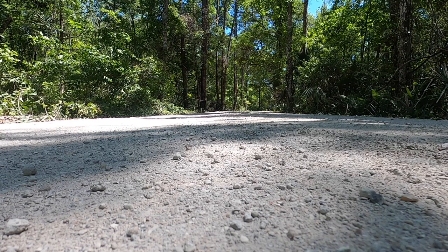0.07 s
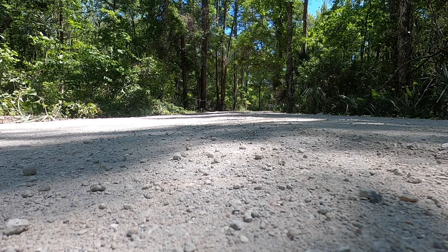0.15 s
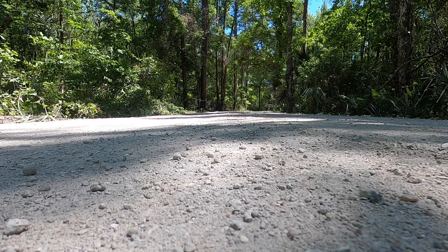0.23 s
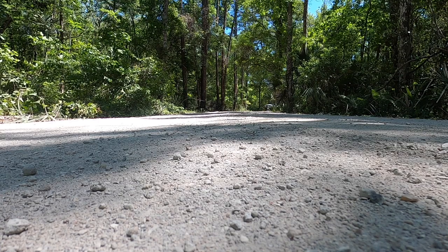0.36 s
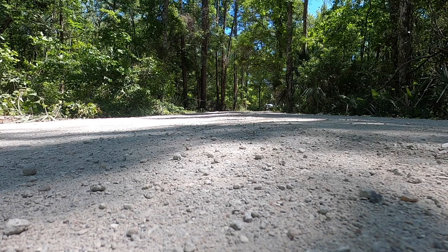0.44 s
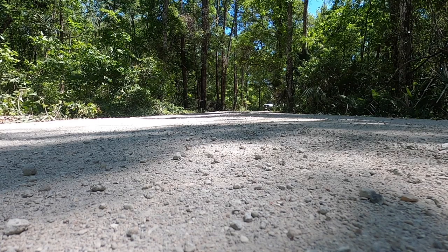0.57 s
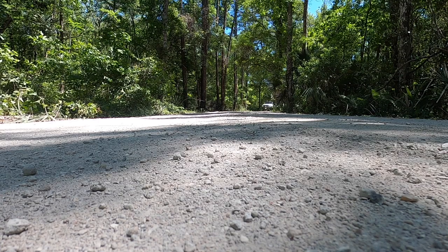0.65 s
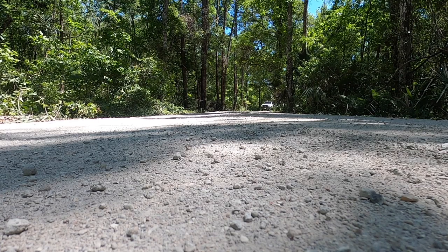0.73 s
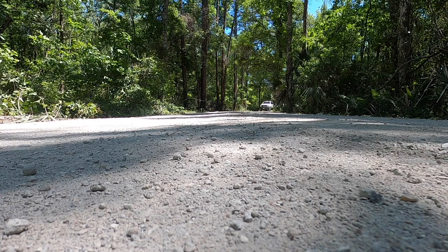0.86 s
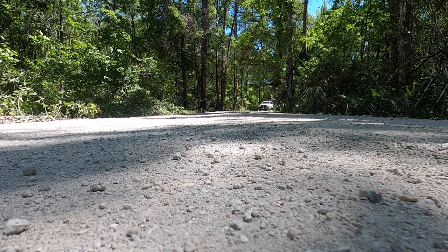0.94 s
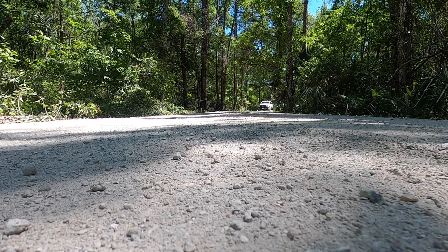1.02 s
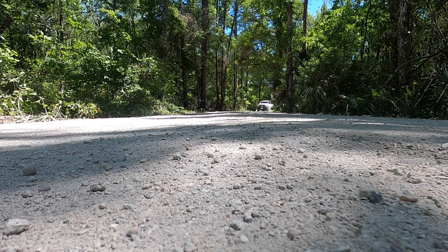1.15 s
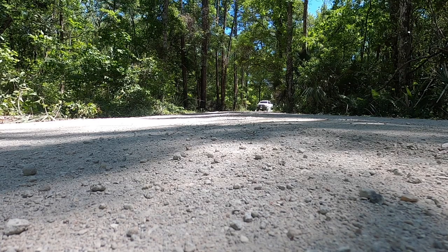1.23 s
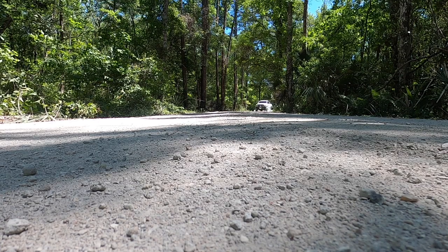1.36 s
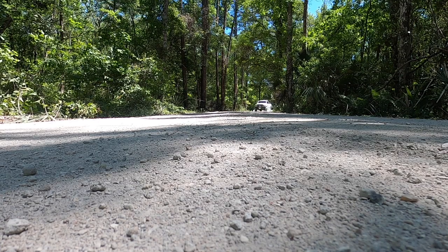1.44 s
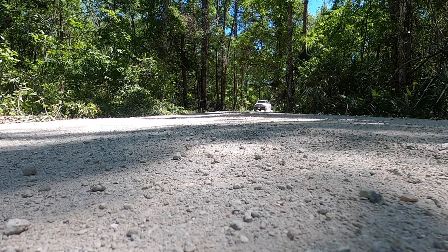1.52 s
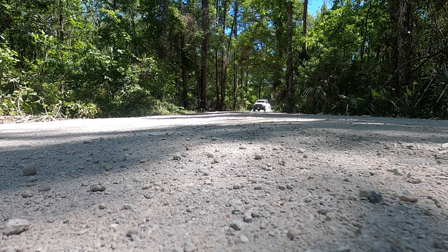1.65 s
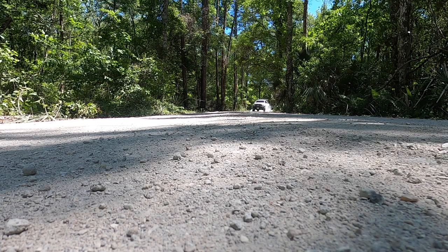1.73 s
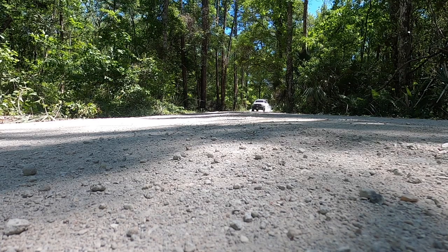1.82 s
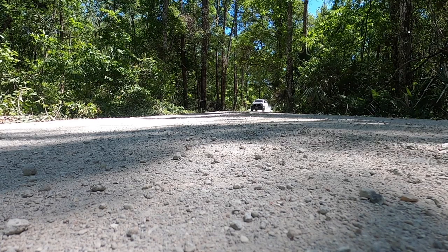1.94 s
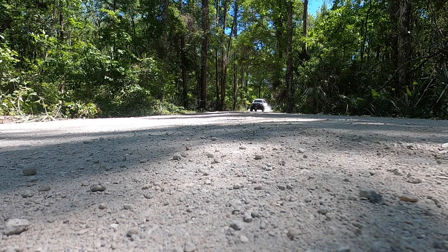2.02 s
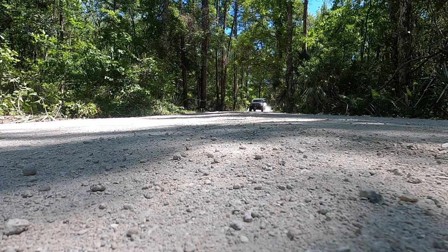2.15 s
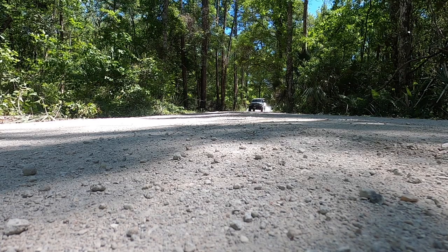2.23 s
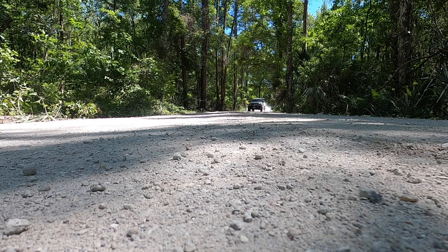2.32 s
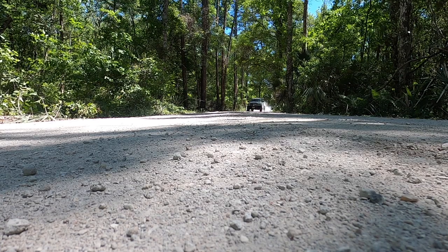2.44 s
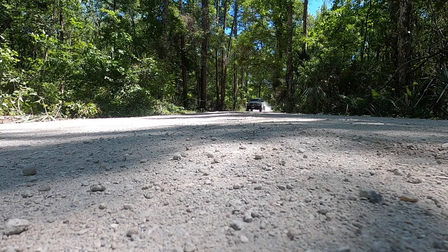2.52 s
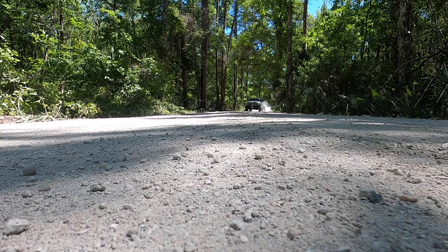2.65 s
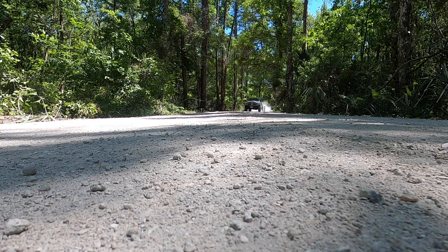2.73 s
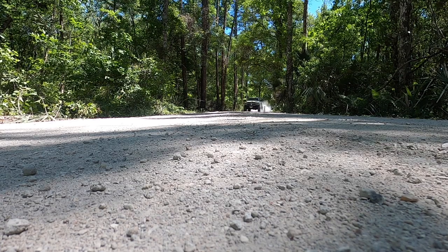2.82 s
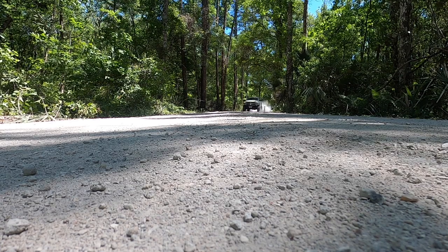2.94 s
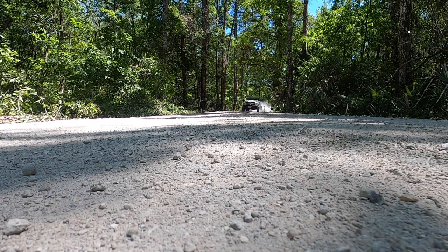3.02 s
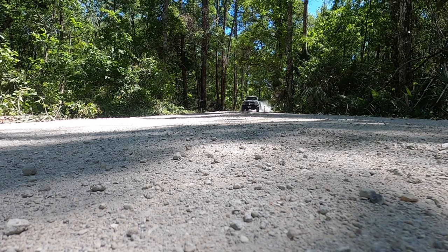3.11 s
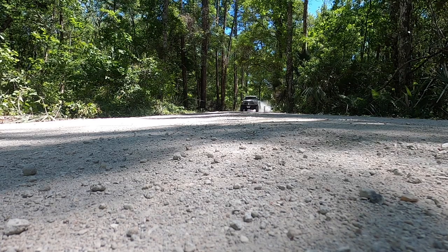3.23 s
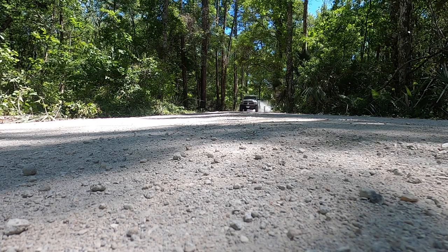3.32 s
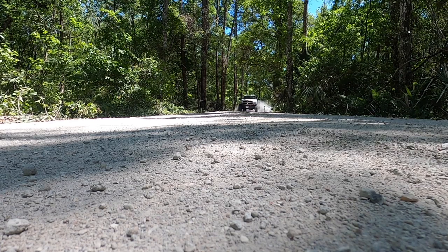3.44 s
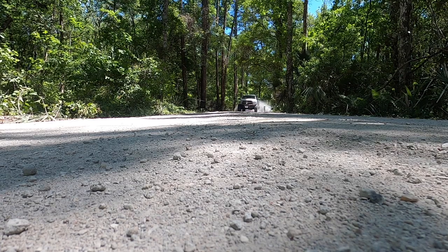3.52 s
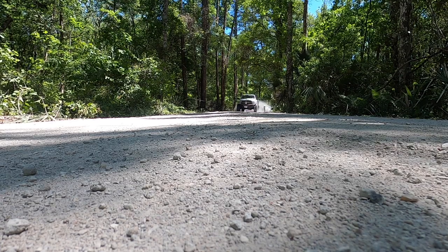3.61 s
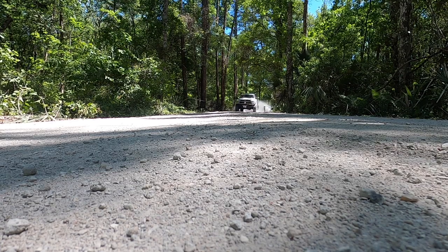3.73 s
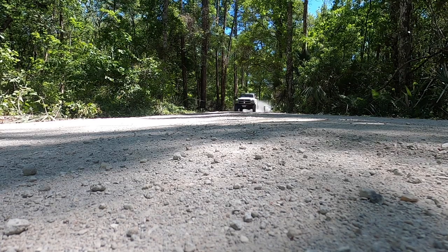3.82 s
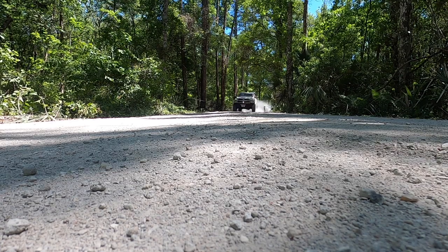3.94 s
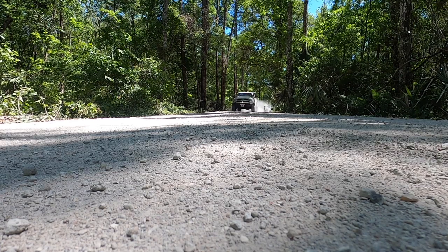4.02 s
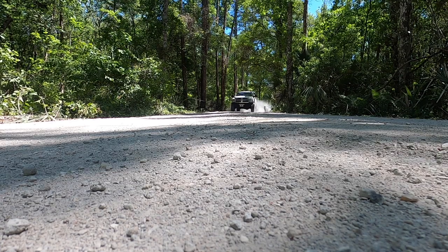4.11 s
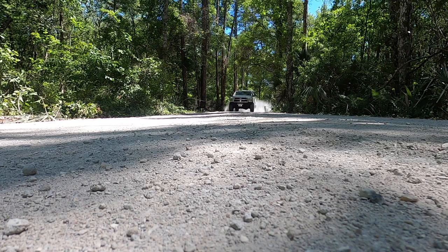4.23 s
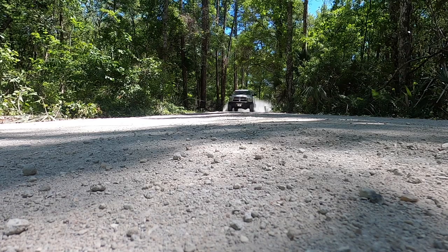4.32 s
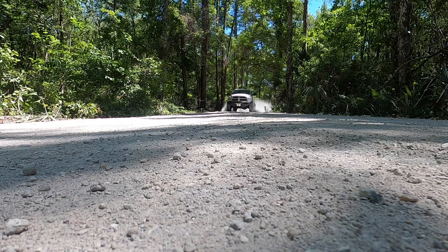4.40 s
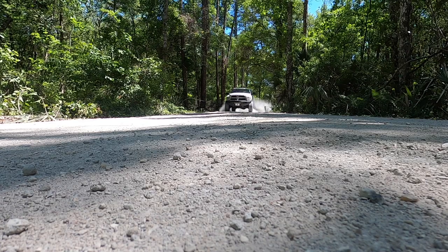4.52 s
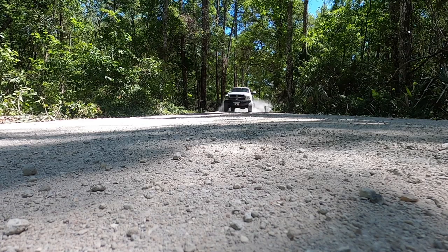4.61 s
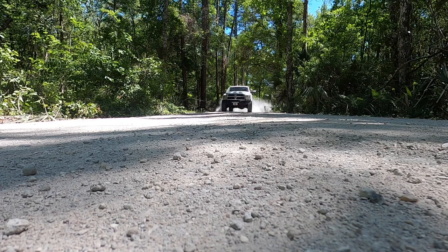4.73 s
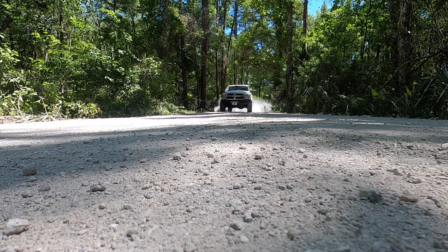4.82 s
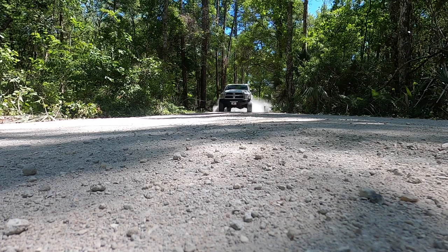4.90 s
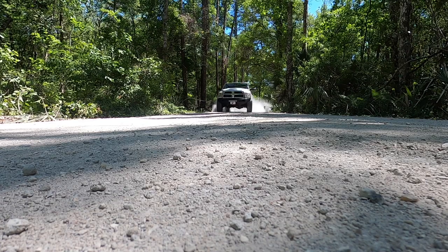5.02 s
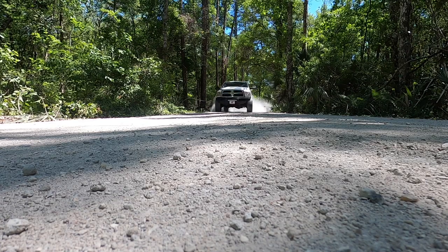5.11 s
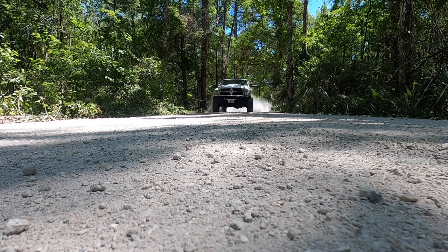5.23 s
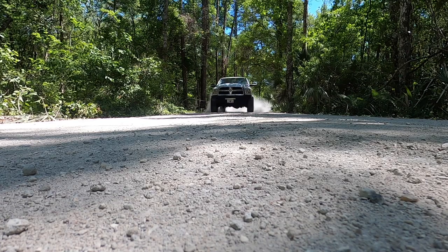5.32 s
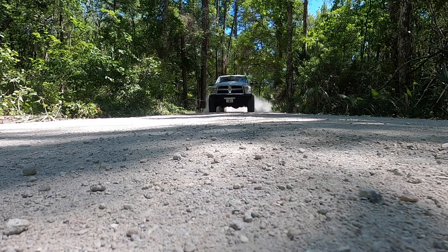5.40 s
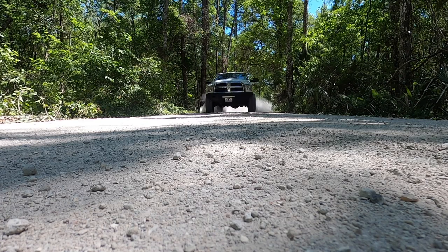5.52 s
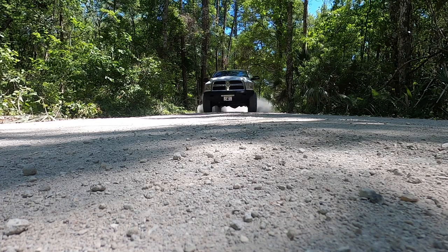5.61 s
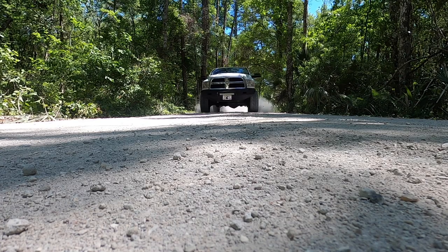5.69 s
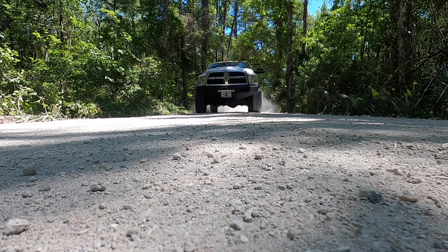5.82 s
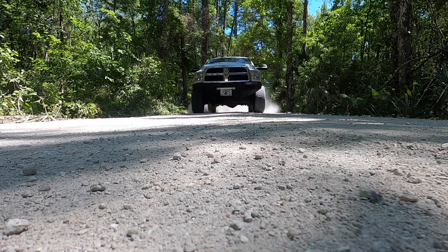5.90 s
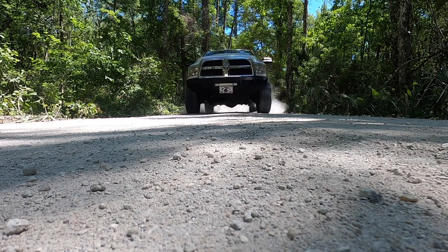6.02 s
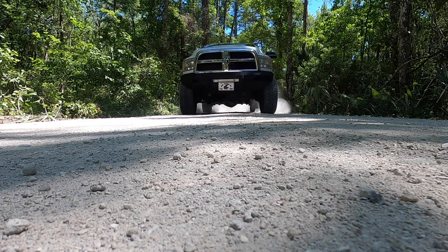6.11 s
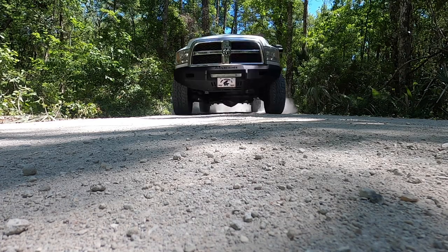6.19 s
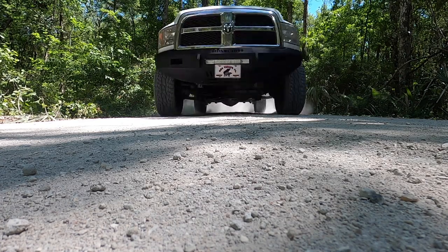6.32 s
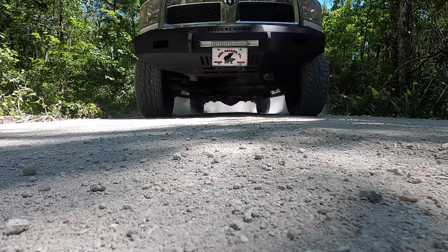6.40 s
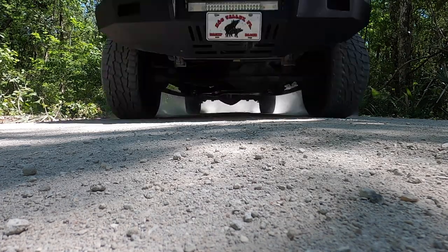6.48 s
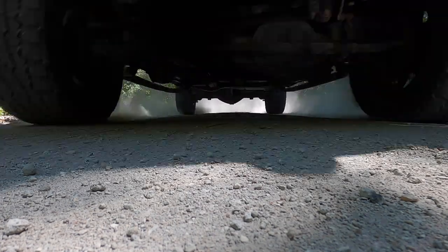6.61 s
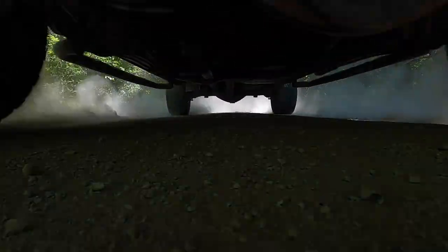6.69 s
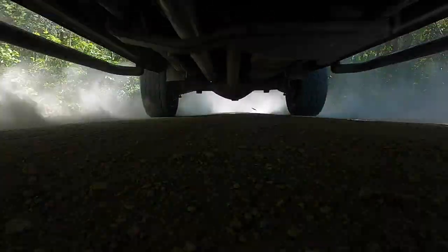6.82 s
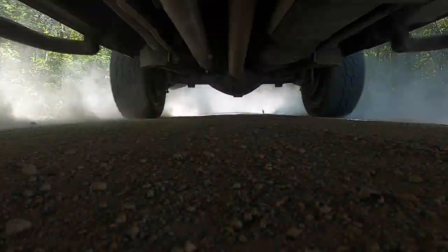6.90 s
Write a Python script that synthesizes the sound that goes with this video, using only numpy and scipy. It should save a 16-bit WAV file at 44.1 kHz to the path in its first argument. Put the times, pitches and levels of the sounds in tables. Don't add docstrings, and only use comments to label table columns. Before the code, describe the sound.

A pickup with a droning, throaty engine approaches along a gravel forest road, tyres crunching ever louder until it roars right over the microphone.

```python
import sys
import numpy as np
from scipy import signal
from scipy.fft import rfft, irfft, next_fast_len
from scipy.io import wavfile
from scipy.ndimage import uniform_filter1d

SR = 44100
rng = np.random.default_rng(int(sys.argv[2]) if len(sys.argv) > 2 else 0)


def to_wav(s):
    ch = np.atleast_2d(s).T
    pcm = np.round(np.clip(ch, -1, 1) * 32767)
    wavfile.write(sys.argv[1], SR, pcm.astype(np.int16))


def level_to_linear(level):
    exponent = np.asarray(level, float) / 20
    return 10 ** exponent


N = 306495
T = np.arange(N) / SR
FAST = next_fast_len(N)
F = np.log2(np.fft.rfftfreq(FAST, 1 / SR) + 1)


def curves(table):
    s, *columns = np.transpose(table)
    return [np.interp(T, s, c) for c in columns]


def unit(x):
    return x / np.sqrt(np.mean(x ** 2))


def noise():
    return rfft(rng.standard_normal(N), FAST)


def band(spectrum, hz, octaves):
    bell = np.exp(-((F - np.log2(hz)) / octaves) ** 2)
    return unit(irfft(spectrum * bell, FAST)[:N])


def band_pair(hz, octaves):
    return np.array([band(noise(), hz, octaves) for _ in range(2)])


def walk(rate):
    knots = rng.standard_normal(400)
    coarse = T[::64]
    joined = np.interp(coarse * rate, np.arange(len(knots)), knots)
    return np.interp(T, coarse, uniform_filter1d(joined, 1 + int(SR / 128 / rate)))


def blend(hz, zones, levels):
    weights = [np.interp(np.log(hz), np.log(zones), row) for row in np.eye(len(zones))]
    return sum(w * v for w, v in zip(weights, levels))


def bump(s, length):
    return np.exp(-((T - s) / length) ** 2)


def decay(age, t60):
    return np.exp(-np.log(1000) * age / t60)


def knocks(table, t60):
    return sum(level_to_linear(db) * (T >= s) * decay(np.abs(T - s), t60) for s, db in table)


SPEED_M_S, OVERHEAD_S, CLEARANCE_M = 9.67, 6.746, 2.2
CREST_S, CREST_RISE_S = 3.26, .8
CRUNCH_DB, FOREST_DB_PER_M = -15.5, 0.0456
HUMP_DB, FAR_DB = -1.5, -61


def approach():
    r = np.hypot(SPEED_M_S * (T - OVERHEAD_S), CLEARANCE_M)
    clear = 1 / (1 + np.exp((CREST_S - T) / CREST_RISE_S))
    direct = CRUNCH_DB - 20 * np.log10(r) - FOREST_DB_PER_M * r + HUMP_DB * (1 - clear)
    db = 20 * np.log10(np.hypot(level_to_linear(direct), level_to_linear(FAR_DB)))
    return db, np.clip((db + 56.5) / 32, 0, 1), clear


CYLINDERS = 6
# [t/s, f/Hz]
CYCLE = [(0, 10.7), (.55, 10.57), (.9, 10.08), (1.08, 10.0), (1.5, 10.23), (1.95, 10.42), (2.3, 10.73),
         (2.58, 10.98), (2.87, 10.74), (3.15, 10.17), (3.8, 10.04), (4.08, 9.48), (4.33, 9.57),
         (4.76, 10.62), (5.05, 10.03), (5.4, 9.53), (6.2, 9.66), (6.95, 9.53)]
# [t/s, level/dB]
FIRING = [(0, -24), (.6, -26.5), (.8, -31.5), (1.15, -34), (1.38, -29), (2.18, -30.5), (2.36, -21.5),
          (2.56, -27), (2.74, -24.5), (3.05, -30), (3.75, -32), (3.98, -37.5), (4.38, -34.5), (4.72, -21.5),
          (4.93, -23), (5.4, -35), (6.1, -29.5), (6.95, -25)]
# [t/s, level/dB, weight of the lowest resonance/dB]
TAILPIPE = [(0, -35.5, 5), (.7, -33.5, 1), (1.1, -36, 2), (1.7, -33, 0), (2.2, -30, -2.5),
            (2.6, -28.5, -1.5), (3.1, -27.5, -3.5), (3.72, -25.5, -1.5), (4.2, -28.5, 1.5), (4.6, -21, -4),
            (4.85, -25, -6.5), (5.1, -22, -3.5), (5.4, -25, -0.5), (5.85, -24, -1.5), (6.2, -19.5, -2),
            (6.6, -19.5, -2), (6.95, -19, 0.5)]
# [f/Hz, width/Hz, level/dB]
PIPE = [(110.3, 6.16, -1.5), (150.88, 6.3, 3.5), (192.7, 6.9, 1), (234.3, 6.1, -3.5), (274.9, 4.2, -3),
        (311.2, 1.7, -12)]
PIPE_ZONE_HZ = [112, 151, 191, 270]
# [far level/dB, gain when near/dB]
PIPE_ZONES = [(-4, 7), (-4, 0.5), (-5.5, -6.5), (-10, -1)]
# [multiple, level/dB]
CYCLE_LINES = [(8, -4.5), (9, -5), (10, 4), (11, 1.5), (12, 0.5), (13, -6), (14, -2), (15, 1.5), (16, -0.5),
               (17, 0.5), (18, 0), (19, 1.5), (20, 1), (21, -6), (22, -3.5), (23, -0.5), (24, -11.5),
               (25, 0), (26, -1.5), (27, -7), (28, -10), (29, -0.5), (30, 8), (31, -4.5), (32, -9),
               (33, -3), (34, -4)]


def engine(wander_db=2.3, revs_db_per_hz=9, flutter_db=1.2, start=0.12, lean_db=-4.0, opening_db=4,
           block_db=-4.0):
    hz, = curves(CYCLE)
    firing_db, = curves(FIRING)
    pipe_db, deep_db = curves(TAILPIPE)
    _, near, clear = approach()
    zone_db = [pipe_db + far + gained * near for far, gained in PIPE_ZONES]
    zone_db[0] = zone_db[0] + deep_db
    zone_db[-1] = zone_db[-1] + revs_db_per_hz * (hz - 10) * clear

    phase = 2 * np.pi * np.cumsum(hz) / SR
    cycle = np.exp(1j * phase)
    slow = slice(0, N, 256)
    slow_zone_db = [z[slow] for z in zone_db]
    pipe = 0
    for k, db in CYCLE_LINES:
        f = k * hz[slow]
        ring = 0
        for m, (c, w, g) in enumerate(PIPE):
            ring = ring + (-1) ** m * level_to_linear(g) * 1j * w * f / (c * c - f * f + 1j * w * f)
        ring = ring + level_to_linear(block_db) * (k == 2 * CYLINDERS)
        ring = ring * level_to_linear(db + blend(f, PIPE_ZONE_HZ, slow_zone_db) + wander_db * walk(4)[slow])
        ring = ring * level_to_linear(opening_db * np.maximum(np.log2(f / 240), 0) * (T[slow] - 5.5))
        turn = np.exp(1j * (walk(3)[slow] / 3 - np.pi * k * k / CYLINDERS))
        turn = turn * (-1) ** min(k, 13)
        pipe = pipe + np.interp(T, T[slow], ring * turn) * cycle ** k

    firing = np.sqrt(2) * level_to_linear(firing_db + flutter_db * walk(8)) * np.cos(CYLINDERS * phase + start)
    lean = level_to_linear(lean_db * np.array([[.5], [-.5]]))
    apart = np.exp(.13j * np.array([[1], [-1]]) * (1 + .3 * walk(7.2)))
    return firing * lean + np.real(pipe * apart) * level_to_linear(2.0)


def boom(hz=315, rough=0.25, level_db=-38, hidden_db=-24, passed_s=6.3, passed_db_per_s=-15):
    db = level_db + hidden_db * (1 - approach()[2]) + 1.5 * walk(4)
    db = db + passed_db_per_s * np.maximum(T - passed_s, 0)
    return np.sqrt(2) * level_to_linear(db) * np.sin(2 * np.pi * hz * T + rough * walk(10))


WHINE_HZ, SLIP_S, SLIP_HZ, SLIP_BACK_S, SWING_HZ = 747, 4.3, 85, .4, .85


def whine(rough=0.55, level_db=-36.5, hidden_db=-20, follows=0.31):
    crunch_db, _, clear = approach()
    since = T - SLIP_S
    swing = np.exp(-np.abs(since) / SLIP_BACK_S) * np.cos(2 * np.pi * SWING_HZ * since)
    hz = WHINE_HZ - SLIP_HZ * (since > 0) * swing
    phase = 2 * np.pi * np.cumsum(hz) / SR + rough * np.pi * walk(14)
    broken = level_to_linear(2.8 * walk(7))
    db = level_db + follows * (crunch_db + 16.5) + hidden_db * (1 - clear)
    return np.sqrt(2) * np.sin(phase) * broken * level_to_linear(db)


SPRAY_S = 6.68
# [f/Hz, level/dB per Hz, side against mid/dB, left minus right/dB]
GRAVEL = [(25, 11, -18.5, -1.4), (80, 19.5, -16.5, -4.5), (204, 14, -19.5, -3), (342, 11, -24.5, 0.6),
          (650, 6.5, -15.5, -1.5), (1211, 5, -18, -1.5), (2000, 0.9, -16, -0.2), (2760, -1.5, -11.5, 1),
          (3400, -7, -5.5, -0.2), (4730, -4.4, -5, 0), (5900, -7.5, -1.5, -4), (7750, -4.5, -2, -3),
          (9800, -18, -4, -2.5), (14000, -18, -1, -0.5)]
TYRE_ZONE_HZ = [400, 1400, 4000, 9000]
# [t/s, level/dB]
CRUNCH_SWELL = [(0, 0), (.4, 1), (1.0, -1.5), (1.9, 0), (2.6, 1.5), (3.6, 0.5), (4.4, 1), (5.1, -1), (5.8, .5),
                (6.45, -1), (6.7, 1), (6.95, 2)]
# [t/s, length/s, level/dB]
PATCHES = [(.28, .06, -1), (2.456, 0.16, 4.5), (3.654, .11, 3), (4.4, .06, 2.5), (4.57, .05, 0.5),
           (5.476, 0.048, 1), (5.72, .06, 1.5), (6.757, 0.049, 2), (6.945, 0.051, 3.5)]


def tyres(stones_per_s=3000, spread_db=4.0, grit=0.32, flicker_db=0.5, clump_db=2.5, level_db=-11,
          dip_hz=860, dip_db=-6, haze_db=-8, bite_hz=2750, bite_db=3, thin_db=-3,
          rumble_db=3.5, hump_db=-4, rumble_share=0.43, upper_db=-7, upper_near_db=-6,
          top_db=-32.0, spray_db=6, sizzle_db=3):
    crunch_db, near, clear = approach()
    loose = sum(db * bump(s, length) for s, length, db in PATCHES)
    low = rumble_db - rumble_share * np.maximum(crunch_db + 47, 0) + hump_db * (1 - clear) ** 2
    spray = np.clip((T - SPRAY_S) / 0.11, 0, 1)
    upper = upper_db + upper_near_db * near + loose + spray_db * spray / 3
    top = top_db + loose + spray_db * spray + sizzle_db * near ** 6

    sizes = level_to_linear(spread_db * np.minimum(rng.exponential(size=(2, N)), 3))
    stones = (rng.random((2, N)) < stones_per_s / SR) * rng.standard_normal((2, N)) * sizes
    cracks = [rfft(unit(x), FAST) for x in stones]
    roll = [noise(), noise()]
    hz, db, side_db, lean_db = np.transpose(GRAVEL)
    out, shared = 0, walk(4.4)
    for c in 28 * 2 ** np.arange(0, 9.2, 1 / 3):
        share = grit * min(c / 3000, 1)
        mid, side = (band(share * x + (1 - share) * y, c, 0.24) for x, y in zip(cracks, roll))
        own, wide, lean = (np.interp(np.log(c), np.log(hz), v) for v in (db, side_db, lean_db))
        gain = own + 10 * np.log10(c / 1400) + blend(c, TYRE_ZONE_HZ, [low, 0, upper, top])
        dip = dip_db * np.exp(-(np.log2(c / dip_hz) / 0.11) ** 2)
        gain = gain + (1 - near) * (dip + haze_db * max(np.log2(c / 8000), 0))
        bite = bite_db * np.exp(-(np.log2(c / bite_hz) / 0.44) ** 2)
        gain = gain + near * ((1 - spray) * bite + thin_db * max(np.log2(150 / c), 0))
        gain = gain + flicker_db * walk(5) + clump_db * near * walk(30) + shared / 4
        left = (mid + level_to_linear(wide) * side) * level_to_linear(lean / 2)
        right = (mid - level_to_linear(wide) * side) * level_to_linear(-lean / 2)
        out = out + level_to_linear(gain) * np.array([left, right])
    return out * level_to_linear(crunch_db + level_db + curves(CRUNCH_SWELL)[0])


# [t/s, length/s, f/Hz, slide/Hz per s, level/dB]
BIRD = [
    (.295, .035, 3450, 10000, -69),
    (.44, .021, 3150, -25000, -61),
    (.5, .025, 2740, 1000, -63),
]


def bird(blur=1.5):
    smear, flutter = blur * walk(60), level_to_linear(4.9 * walk(45))
    song = 0
    for s, length, hz, slide, db in BIRD:
        age = T - s
        phase = 2 * np.pi * (hz + slide * age / 2) * age + smear
        song = song + level_to_linear(db) * bump(s, length) * np.sin(phase)
    return flutter * song


# [t/s, level/dB]
RATTLES = [(2.3408, -46.5), (2.3384, -56), (2.3864, -51.5), (2.4372, -43), (2.476, -58), (2.5517, -44.5),
           (4.3586, -48), (4.3896, -39), (4.4381, -41.5)]


def rattles(t60=.13, hz=4500, octaves=0.62):
    return knocks(RATTLES, t60) * level_to_linear(-14) * band_pair(hz, octaves)


# [t/s, f/Hz, level/dB]
PINGS = [
    (2.345, 3370, -43),
    (2.55, 3330, -58),
    (6.809, 1456, -7.5),
    (6.856, 1400, -16),
]


def pings(t60=0.054, rise=0.002):
    out = 0
    for s, hz, db in PINGS:
        age = np.clip(T - s, 0, 1)
        swell = (1 - np.exp(-age / rise)) * decay(age, t60)
        out = out + level_to_linear(db) * swell * np.sin(2 * np.pi * hz * T + 2 * walk(55))
    return out


# [t/s, level/dB]
TICKS = [
    (2.647, -74),
    (4.488, -70.5),
    (5.171, -85.5),
    (5.72, -67),
]


def ticks(t60=.012):
    return knocks(TICKS, t60) * band(noise(), 10000, 0.36)


# [t/s, length/s, level/dB]
INSECT = [(3.63, 0.16, -82.5), (4.38, .04, -70), (4.5, 0.097, -70), (5.17, .04, -77), (5.493, 0.067, -69),
          (5.68, .06, -64.5), (5.778, .07, -68.5)]


def insect(hz=7620, octaves=.025, throb_hz=45):
    swell = sum(level_to_linear(db) * bump(s, length) for s, length, db in INSECT)
    buzz = swell * (1 + .5 * np.sin(2 * np.pi * throb_hz * T))
    return buzz * band_pair(hz, octaves)


# [t/s, level/dB]
AXLE = [(6.7, -62), (6.77, -45), (6.82, -52), (6.86, -43), (6.92, -42), (6.95, -50)]


def axle(hz=4950, octaves=.08):
    return level_to_linear(curves(AXLE)[0]) * (T > AXLE[0][0]) * band_pair(hz, octaves)


def scene():
    truck = engine() + boom() + whine() + tyres() + rattles() + pings() + axle()
    return truck + ticks() + bird() + insect()


def top_cut(x):
    return signal.sosfilt(signal.butter(12, 15900, fs=SR, output="sos"), x)


# [crunch level/dB, edge f/Hz]
EDGE = [(-56, 9000), (-44, 10500), (-34, 14200), (-21, 15500)]
EDGE_DIP_S, EDGE_DIP_HZ = (6.81, 6.89), 13700


def record(dry):
    left_late = np.concatenate([dry[0, :1], dry[0, :-1]])
    hz, s, z = signal.stft(np.array([left_late, dry[1]]), SR, nperseg=1024, boundary="odd")
    clicking = np.abs(s - np.array(TICKS)[:, :1]).min(axis=0) < .012
    crunch_db = np.interp(s, T, approach()[0])
    edge = np.where(clicking, 14200, np.interp(crunch_db, *np.transpose(EDGE)))
    edge[(s > EDGE_DIP_S[0]) & (s < EDGE_DIP_S[1])] = EDGE_DIP_HZ
    ragged = rng.exponential(size=(66, len(s) // 2 + 1))
    ragged = np.repeat(np.repeat(ragged, 8, axis=0), 2, axis=1)[:len(hz), :len(s)]
    heard = z * (hz[:, None] < edge * (1.02 - .035 * ragged))
    mix = signal.istft(heard, SR, nperseg=1024)[1][:, :N]
    return top_cut(mix)


dry = scene()
out = record(dry)
to_wav(out)
```